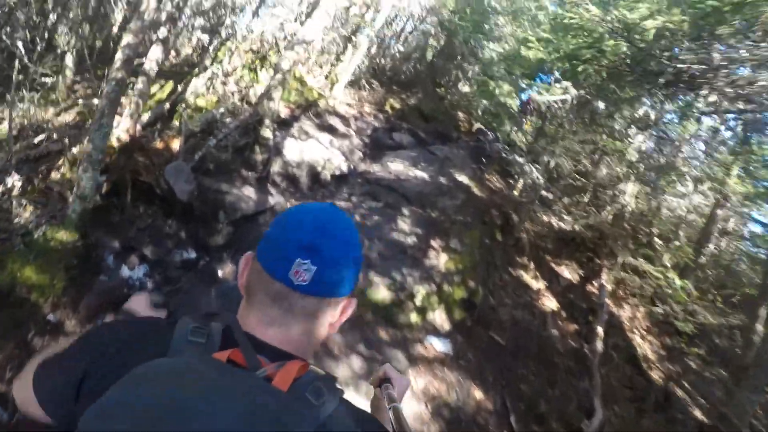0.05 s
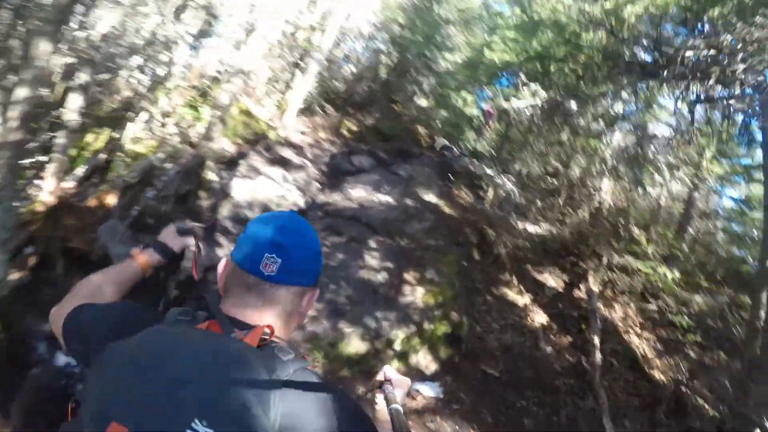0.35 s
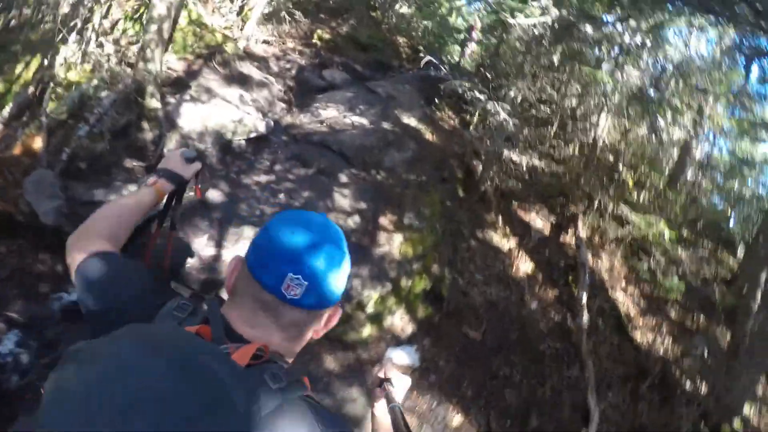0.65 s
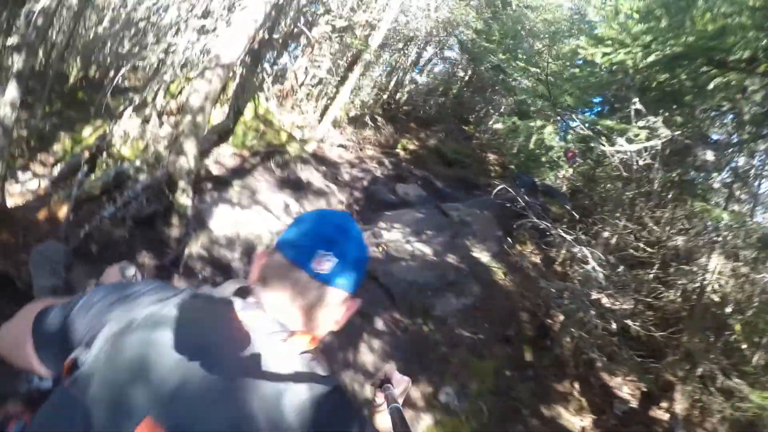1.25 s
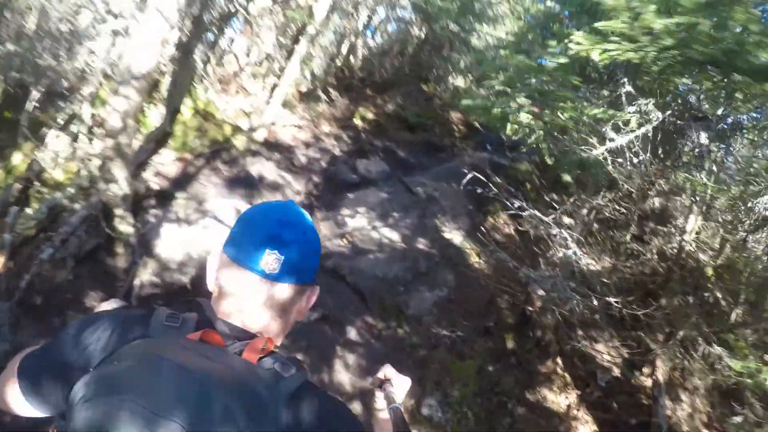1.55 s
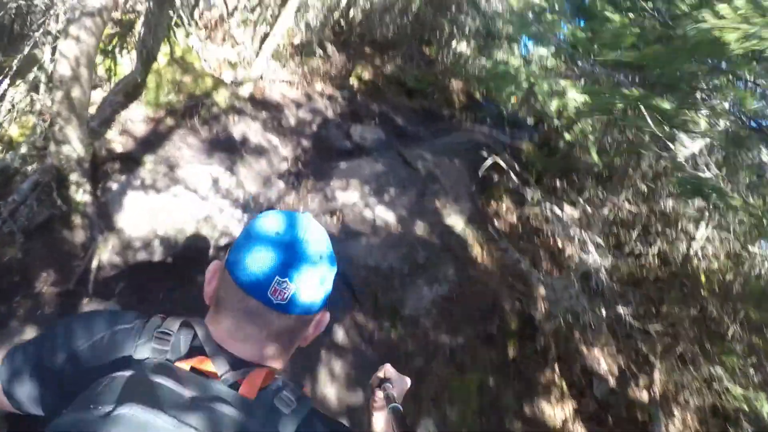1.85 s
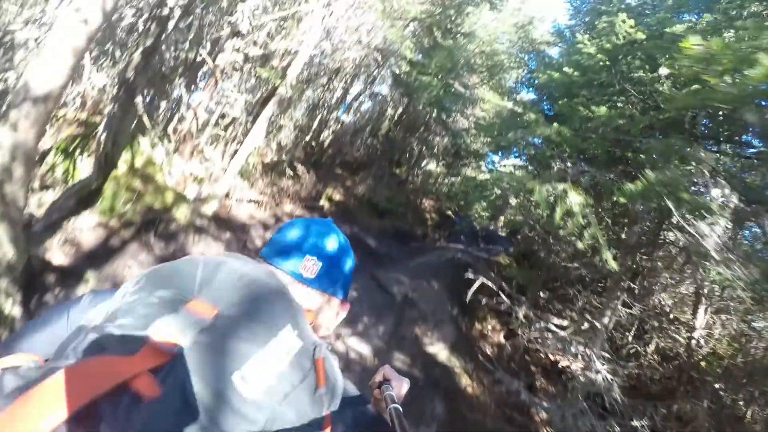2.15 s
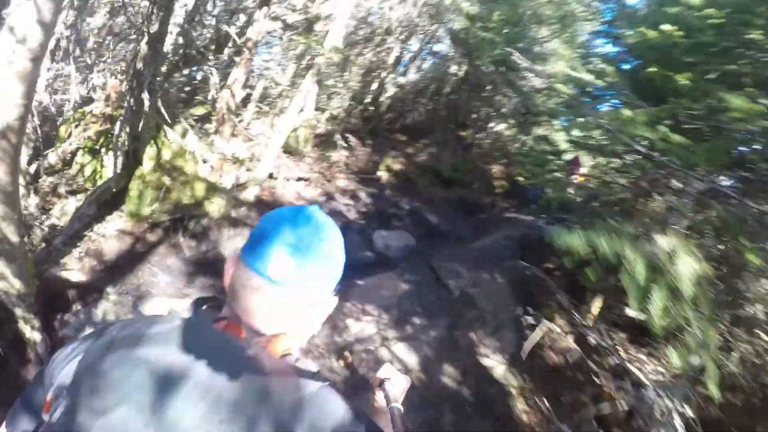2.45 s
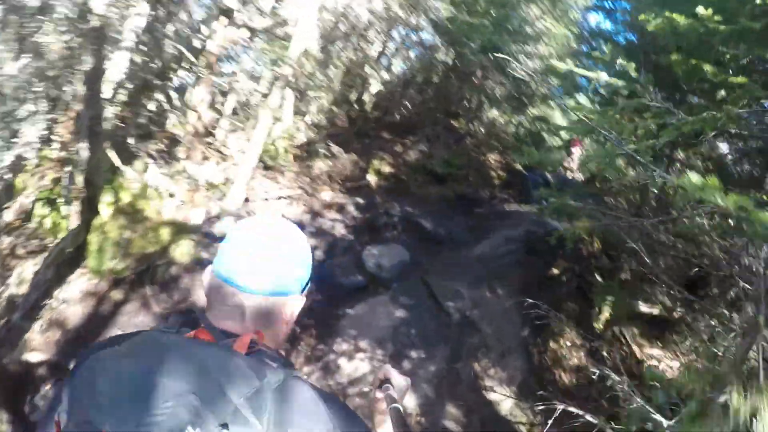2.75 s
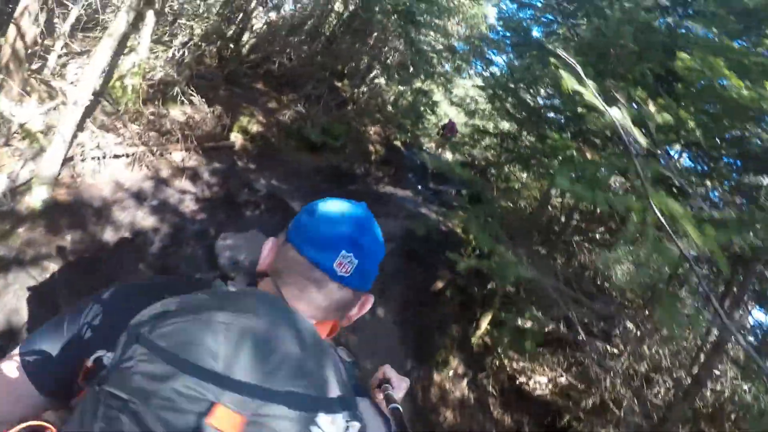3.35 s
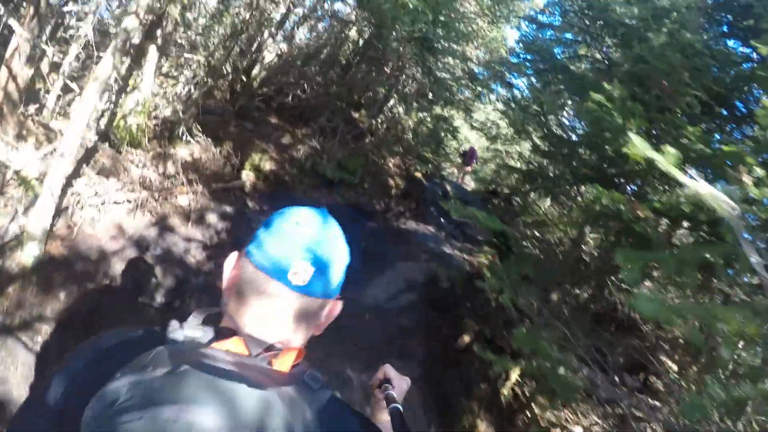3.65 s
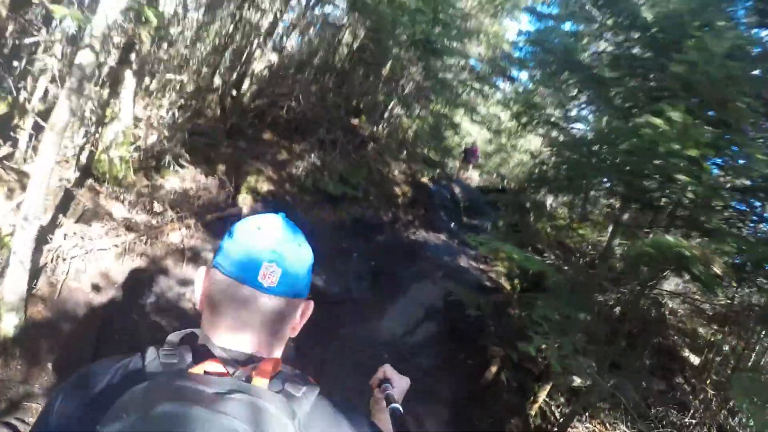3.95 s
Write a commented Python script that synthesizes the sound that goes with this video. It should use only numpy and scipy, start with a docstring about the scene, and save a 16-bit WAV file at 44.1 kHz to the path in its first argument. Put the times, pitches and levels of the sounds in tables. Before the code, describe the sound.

On a forest trail, hiking poles strike and bounce on rock, pause, then strike once more at the end. A body-worn microphone picks up constant low shaking, dull footfalls, puffs of wind and a tiny twig snap.

```python
"""A low rumble, puffs of wind and a soft forest hiss open a hiker's climb up a rocky trail.
The rumble is the microphone mount shaking on his backpack; the puffs are air brushing the microphone ports.
Boots land with dull knocks and jolt the mount. Pole tips strike, bounce and skid on rock and ring the shafts.
Twigs or pebbles tick twice, and nearby trunks and rock give each hit a short echo."""
import sys
import numpy as np
from scipy import signal
from scipy.fft import rfft, irfft
from scipy.io import wavfile

SR = 44100
rng = np.random.default_rng(int(sys.argv[2]) if len(sys.argv) > 2 else 0)


def master(y):
    """Save y as 16-bit WAV."""
    cut = np.clip(np.atleast_2d(y).T, -1, 1)
    pcm = np.round(cut * 32767)  # scale
    wavfile.write(sys.argv[1], SR, pcm.astype(np.int16))


N = 176400
TIME = np.arange(N) / SR

# Pole tips touching rock: (time [s], pole [left or right], clack [dB], shaft ring [dB], crunch [dB],
# fade time [s], left minus right [dB])
POLE_HITS = [(.200, "left", -41.5, -59, -62, 0.0037, 2), (0.7004, "left", -36, -14.5, -34, 0.0039, 6),
             (0.7142, "left", -34, -17.5, -36.5, 0.0031, 7), (0.729, "left", -37, -21, -43.5, 0.0055, 3),
             (0.8214, "left", -35.5, -30, -62, 0.0033, 6.5), (0.8282, "left", -33.5, -28, -44, .0055, -1),
             (1.6778, "left", -37, -42, -63, .003, -1), (1.681, "left", -32, -24, -48, 0.0036, 9),
             (1.685, "left", -33, -35, -38, 0.0089, 1), (1.7103, "left", -54, -31, -47, 0.019, -12),
             (1.837, "left", -70, -58, -52, 0.027, -27), (3.8603, "right", -28, -22, -32.5, 0.0021, -2.5),
             (3.869, "right", -36, -25, -37, 0.002, 7), (3.905, "right", -41.5, -44, -66, .003, -8)]


def from_db(db):
    """Turn decibels into a number to multiply a sound by."""
    return 10 ** (np.asarray(db) / 20)


def rms_one(x):
    """Scale a signal so its average strength (rms) is 1."""
    return x / np.sqrt(np.mean(x ** 2) + 1e-20)


def in_time(rows):
    """Join (time, value) points with straight lines."""
    return np.interp(TIME, *np.transpose(rows))


def panned(db):
    """Left and right gains; positive decibels favour the left."""
    return from_db(np.array([[.5], [-.5]]) * db)


def drift(step_s):
    """A random wander with a new value every step."""
    points = rng.standard_normal(N)
    return rms_one(np.interp(TIME / step_s, np.arange(N), points))


def noise(spectrum, envelope=1):
    """Stereo noise: the envelope shapes its loudness, then the spectrum shapes its tone."""
    # How alike the left and right channels sound; the highest treble sits in the centre:
    # (frequency [Hz], correlation [-1 to 1])
    likeness = [(30, 0.72), (70, 0.93), (140, 0.74), (300, 0.23), (650, -0.55), (1200, -0.31),
                (2200, 0.053), (4000, 0.77), (6000, -0.0087), (9000, -0.15), (12000, 1)]
    log_hz = np.log(np.maximum(np.arange(N // 2 + 1) * SR / N, 1))
    hz, alike = np.transpose(likeness)
    alike = np.clip(np.interp(log_hz, np.log(hz), alike), -1, 1)
    mid, side = rfft(rng.standard_normal((2, N)))
    white = rms_one(irfft(np.sqrt(1 + alike) * mid + np.sqrt(1 - alike) * side * [[1], [-1]], N))
    hz, db = np.transpose(spectrum)
    outside = np.maximum(np.log(hz[0]) - log_hz, 0) + np.maximum(log_hz - np.log(hz[-1]), 0)
    gain = from_db(np.interp(log_hz, np.log(hz), db) - 30 * outside)  # fades past the table's ends
    return irfft(rms_one(gain) * rfft(white * envelope), N)


def ring(force, hz, ring_s):
    """Each push starts a pure tone that fades by 60 dB in ring_s seconds."""
    fade = np.exp(-np.log(1000) / (ring_s * SR))
    turn = 2 * np.pi * hz / SR
    return signal.lfilter([0, np.sin(turn)], [1, -2 * fade * np.cos(turn), fade * fade], force + 1e-18)


def burst(s, rise_s, fade_s):
    """A quick rise at time s, then a smooth fade."""
    age = np.maximum(TIME - s, 0)
    return np.minimum(age / rise_s, 1) * np.exp(-np.maximum(age - rise_s, 0) / fade_s)


def click(s, delay_s=0.001035):
    """A one-sample push just after a hit begins."""
    return signal.unit_impulse(N, int((s + delay_s) * SR))


def mount():
    """The mount shakes at its own low pitch as the hiker moves; heavy steps ring a higher one too."""
    # Strength of the shaking: (time [s], level [dB])
    sway = [(0, -37), (.07, -20.5), (.3, -31), (.48, -33.5), (.6, -16.5), (.75, -24), (1.15, -20.5),
            (1.4, -27), (1.85, -26.5), (2.02, -20.5), (2.15, -28.5), (2.5, -26), (2.8, -25), (3.3, -25),
            (3.6, -29.5), (3.9, -23), (4, -32)]
    # Heavy steps: (time [s], main ring [dB], upper ring [dB])
    steps = [(0.378, -15.5, -20), (0.58, -15.5, -13), (0.996, -4.5, -11.5), (1.062, -5, -21),
             (1.218, -17, -25), (2.26, -11.5, -8.5), (2.268, -9, -29), (2.313, -5, -28), (3.308, -11, -44)]
    # Tone of the rumble: (frequency [Hz], level [dB])
    rumble_tone = [(20, 13.5), (35, -7), (65, 5), (100, -5), (160, -18.5), (300, -59)]
    main_hz, width_hz, push_s = 39.15, 7.64, 0.0031
    shake = signal.hilbert(ring(rng.standard_normal(N), main_hz, np.log(1000) / (np.pi * width_hz)))
    shake = rms_one(shake.real / (abs(shake) + 0.28 * shake.real.std()))  # partly even out its swells
    main, upper = np.zeros((2, N))
    for s, main_db, upper_db in steps:
        push = np.exp(-(2 * (TIME - s) / push_s) ** 2)
        main -= from_db(main_db) * push / push.sum()
        upper -= from_db(upper_db) * push / push.sum()
    jolts = ring(main, main_hz, ring_s=0.46) + ring(upper, hz=70.5, ring_s=0.15)
    sway_db = in_time(sway)
    rumble = from_db(-29 + 0.54 * (sway_db - sway_db.mean())) * noise(rumble_tone)
    return (from_db(sway_db) * shake + jolts + rumble) * panned(-0.5)


def wind():
    """Puffs of air brush the microphone ports, fluttering separately at each one."""
    # Strength of the puffs: (time [s], level [dB])
    gusts = [(0, -44.5), (.3, -47), (.43, -33), (.52, -49.5), (.85, -47), (1.05, -42.5), (1.2, -47),
             (1.42, -33), (1.64, -35.5), (1.82, -47), (2.25, -33.5), (2.48, -41.5), (2.59, -42.5),
             (2.7, -30.5), (2.79, -42), (3.2, -47.5), (3.46, -36), (4, -41)]
    # Tone of the wind: (frequency [Hz], level [dB])
    wind_tone = [(50, 2), (110, 3.5), (210, -2.5), (320, -11.5), (600, -21), (1200, -30.5), (3000, -62)]
    # Which side is louder: (time [s], left minus right [dB])
    sides = [(0, 1), (1.6, -2.5), (2.3, -2), (2.7, -5.5), (3.0, 0), (3.5, -7), (4, 0.5)]
    flutter_db, flutter_hz = 2.5, 22.25
    flutter = np.array([drift(1 / flutter_hz) for _ in range(2)])
    level_db = 0.5 + in_time(gusts) + flutter_db * flutter
    return from_db(level_db) * noise(wind_tone) * panned(in_time(sides))


def forest():
    """A smooth distant rush and a fine hiss, both easing as the hiker climbs."""
    # Loudness of the forest: (time [s], relative level [dB])
    air = [(0.0, -50.5), (1.3, -50), (1.7, -50), (2.17, -54), (2.95, -54.5), (4.0, -54.5)]
    # Tones of the rush and the hiss: (frequency [Hz], level [dB])
    rush_tone = [(200, -2.5), (600, 5), (1100, 2.5), (1750, 1.5), (2800, -4.5), (3600, -9.5), (4600, -13),
                 (8000, -20.5)]
    hiss_tone = [(3000, 0), (4600, -4.5), (6300, 5.5), (7500, 4), (8400, 1.5), (10200, 0), (11500, -7),
                 (13500, -9.5), (15000, -32)]
    air_db = in_time(air)
    rush = from_db(2.5 + air_db) * noise(rush_tone) * panned(1.5)
    hiss = from_db(-59.5 + 0.61 * (air_db - air_db.mean())) * noise(hiss_tone) * panned(-1)
    return rush + hiss


def boots():
    """Boots and pack knock dully: a thud plus a hollow tone that dies quickly."""
    # Each knock: (time [s], thud [dB], hollow pitch [Hz], hollow tone [dB])
    knocks = [(.156, -35, 600, -40), (0.984, -26.5, 610, -37), (1.264, -29.5, 626, -29.5),
              (1.411, -33.5, 805, -35), (1.68, -41, 705, -31.5), (2.061, -37, 564, -41),
              (2.108, -34, 440, -36), (2.258, -34, 380, -49), (2.324, -37, 780, -40),
              (2.536, -26.5, 460, -28.5), (3.065, -41, 490, -38.5), (3.081, -45, 535, -39.5)]
    # Tone of a thud: (frequency [Hz], level [dB])
    thud_tone = [(100, 14.5), (220, 4), (350, -1.5), (500, -1), (800, -10), (1300, -17.5), (4000, -40),
                 (9000, -50)]
    thuds, tones = np.zeros((2, N))
    for s, thud_db, tone_hz, tone_db in knocks:
        thuds += from_db(thud_db) * burst(s, rise_s=0.002, fade_s=0.0085)
        tones += from_db(tone_db) * ring(click(s), tone_hz, ring_s=0.019)
    return noise(thud_tone, thuds) + tones


def pole_tips():
    """Each hit crunches on grit and clacks through the pole."""
    # Tones of the clack and the crunch: (frequency [Hz], level [dB])
    clack_tone = [(300, -0.5), (750, -1.5), (1200, -6), (1750, 3), (2300, -4), (3200, -6), (4100, -7),
                  (4700, -29), (12000, -27)]
    crunch_tone = [(1500, -36), (3500, -3.5), (4700, -0.5), (5600, 3), (6500, 2), (7500, 1.5), (8200, -9),
                   (10000, -6), (11300, -34), (14500, -34)]
    clack, crunch = np.zeros((2, 2, N))
    for s, _, clack_db, _, crunch_db, fade_s, pan_db in POLE_HITS:
        contact = burst(s, rise_s=0.00069, fade_s=fade_s)
        clack += from_db(clack_db) * contact * panned(pan_db)
        crunch += from_db(crunch_db) * contact * panned(-0.5)
    grit = rms_one(from_db(-0.5 * drift(step_s=0.00022)))  # a slight, very fast roughness
    return noise(clack_tone, grit * clack) + noise(crunch_tone, grit * crunch)


def pole_shafts():
    """Each hit rings all the pitches of that pole's shaft; the soft contact dulls the highest."""
    # Natural pitches of each pole: (frequency [Hz], relative level [dB], ring time [s])
    shafts = {"left": [(1680, -26, .05), (1820, -13.5, .028), (2910, -10.5, 0.021), (3240, -12.5, 0.018),
              (3810, -1, 0.019), (3945, -13.5, 0.055), (4140, -15, 0.03), (6950, -35, .025)],
              "right": [(1710, -10, .05), (2620, -14.5, 0.067), (3240, -26, 0.033), (3530, -10, 0.017),
              (3760, -15, .04), (5580, -6, 0.015), (6400, -7, .022)]}
    pan_share, dull_hz = .4, 7200
    rings = np.zeros((2, N))
    for name, pitches in shafts.items():
        force = sum(from_db(ring_db) * click(s) * panned(pan_share * pan_db)
                    for s, pole, _, ring_db, _, _, pan_db in POLE_HITS if pole == name)
        for k, (hz, db, ring_s) in enumerate(pitches):
            rings += (-1) ** k * from_db(db) * ring(force, hz, ring_s)  # every other one is flipped
    return .5 * signal.sosfilt(signal.butter(2, dull_hz, fs=SR, output="sos"), rings)


def echo(sound, level_db=-3.5, delay_s=0.0022, ring_s=0.18):
    """Nearby trunks and rock scatter the sound into a short, blurred tail."""
    tail = rng.standard_normal((2, N)) * burst(delay_s, rise_s=delay_s, fade_s=ring_s / np.log(1000))
    tail /= np.linalg.norm(tail, axis=1, keepdims=True)
    return from_db(level_db) * signal.fftconvolve(sound, tail, axes=1)[:, :N]


def twig_ticks():
    """Twigs or pebbles give tiny bright snaps, each ringing briefly at two pitches."""
    # Each tick: (time [s], snap [dB], low pitch [Hz], high pitch [Hz], ring [dB], left minus right [dB])
    ticks = [(2.452, -34, 4380, 9400, -46, -3), (2.6616, -51, 5680, 7350, -50, 8)]
    # Tone of a snap: (frequency [Hz], level [dB])
    snap_tone = [(1800, 2), (3400, 2), (6500, -1.5), (9700, -11), (14500, -28)]
    snaps, rings = np.zeros((2, 2, N))
    for s, snap_db, low_hz, high_hz, ring_db, pan_db in ticks:
        snaps += from_db(snap_db) * burst(s, rise_s=0.00068, fade_s=0.0015) * panned(pan_db)
        for hz in (low_hz, high_hz):
            rings += from_db(ring_db) * ring(click(s), hz, ring_s=.016) * panned(pan_db)
    return noise(snap_tone, snaps) + rings


def scene():
    """Poles, boots and ticks echo among the trees, over mount rumble, wind and forest."""
    clicks = pole_tips() + twig_ticks()
    rings = pole_shafts()
    knocks = boots()
    tail = echo(clicks + from_db(-9) * rings + from_db(-9.5) * knocks)
    return clicks + rings + knocks + tail + mount() + wind() + forest()


def record(dry):
    """Remove the slowest drift and steeply cut the highest treble."""
    low_cut_hz, high_cut_hz = 8, 14600
    steady = signal.sosfilt(signal.butter(1, low_cut_hz, "high", fs=SR, output="sos"), dry)
    return signal.sosfilt(signal.ellip(10, .1, 80, high_cut_hz, fs=SR, output="sos"), steady)


dry = scene()
out = record(dry)
master(out)
```